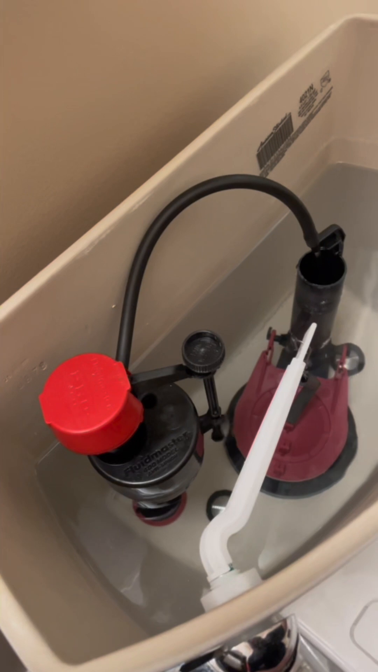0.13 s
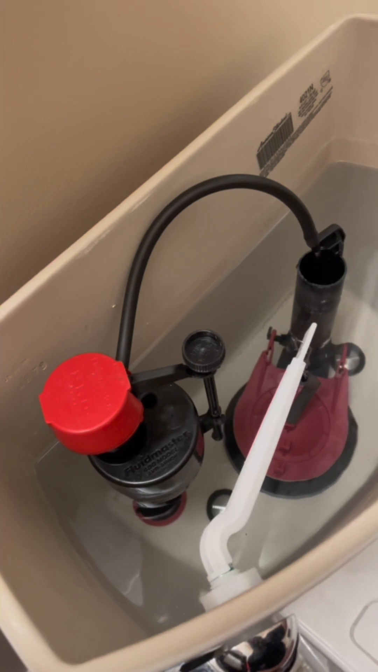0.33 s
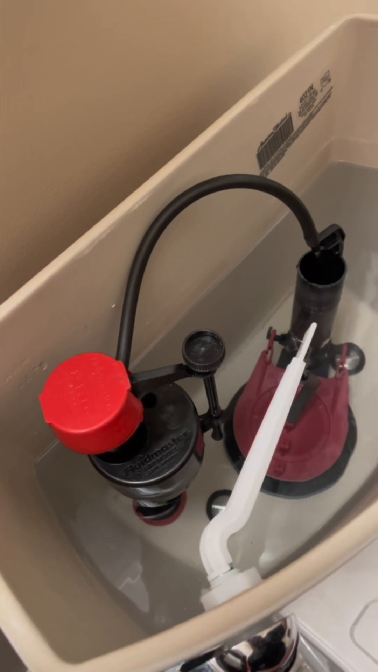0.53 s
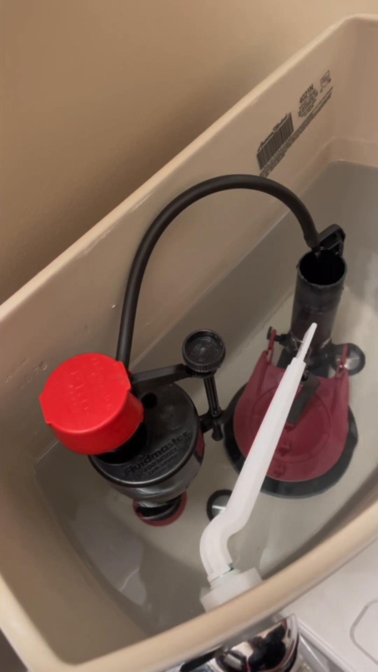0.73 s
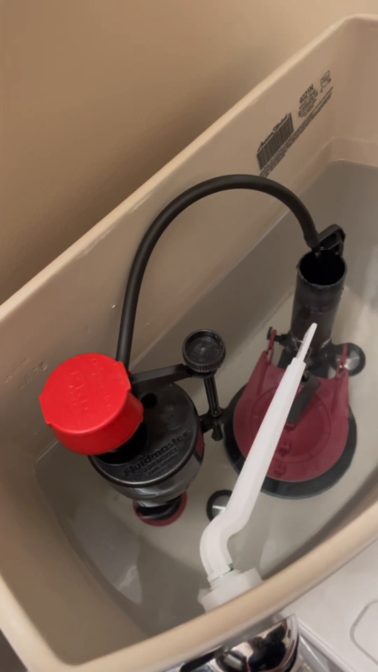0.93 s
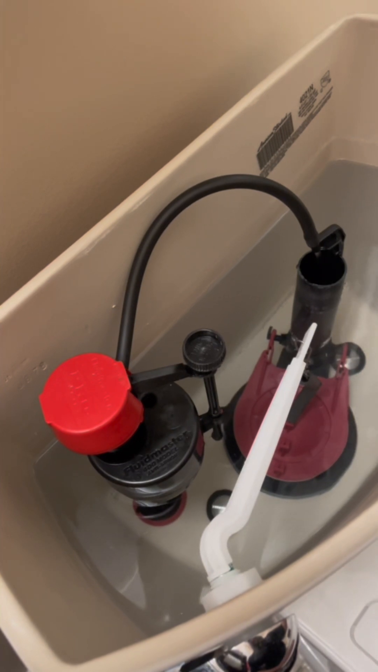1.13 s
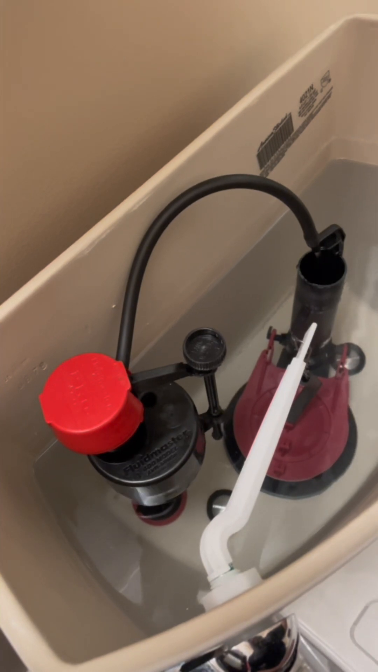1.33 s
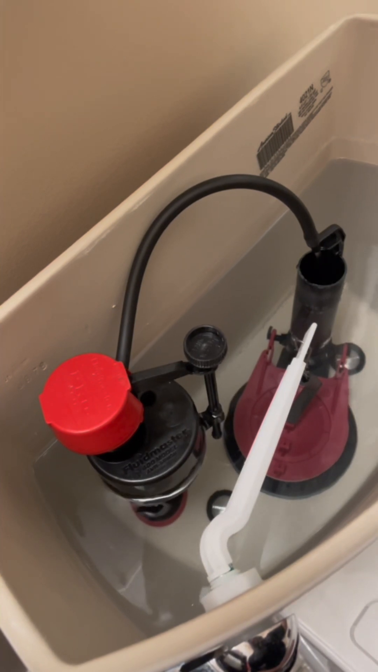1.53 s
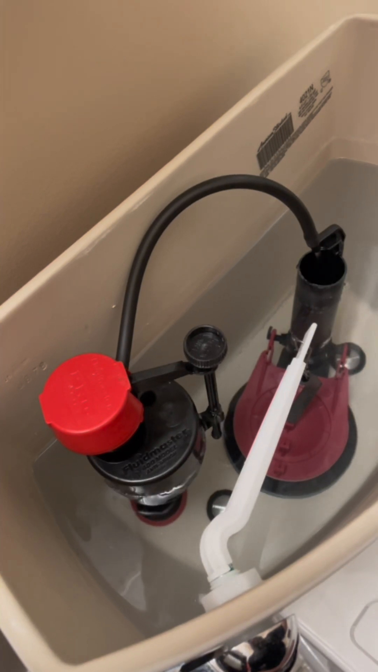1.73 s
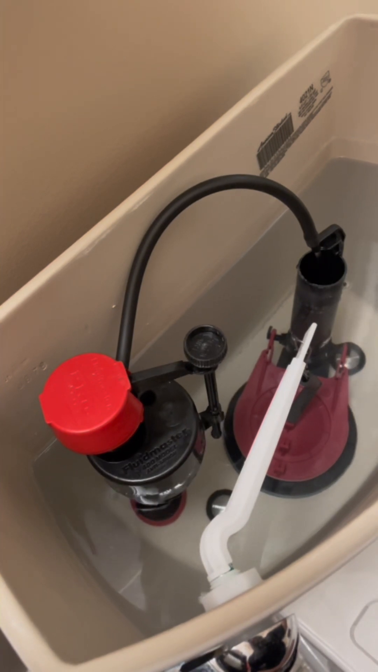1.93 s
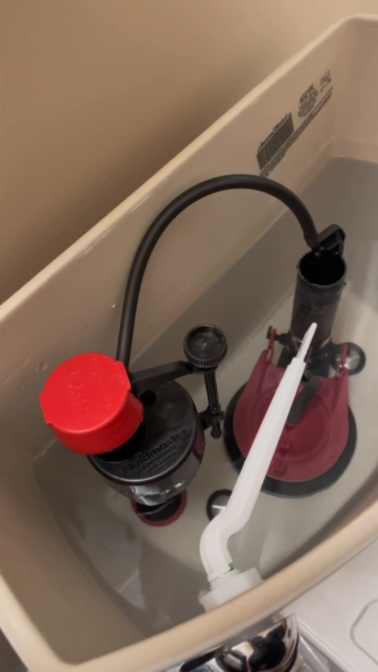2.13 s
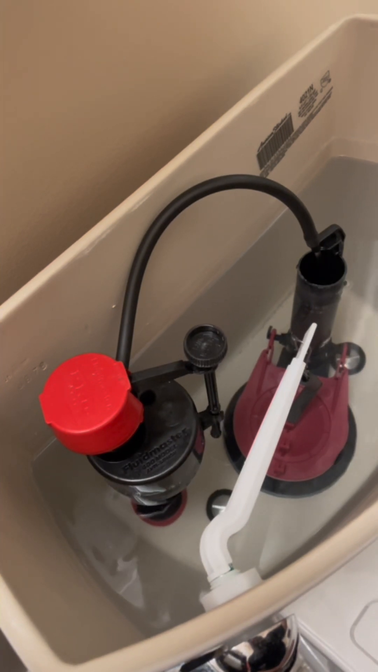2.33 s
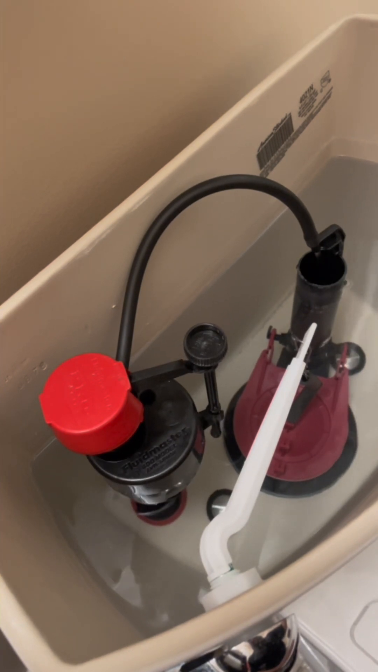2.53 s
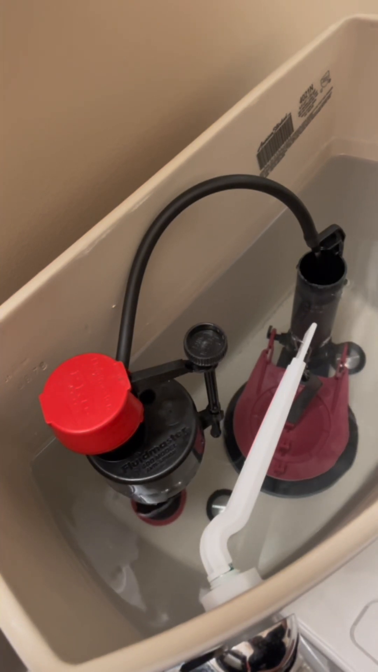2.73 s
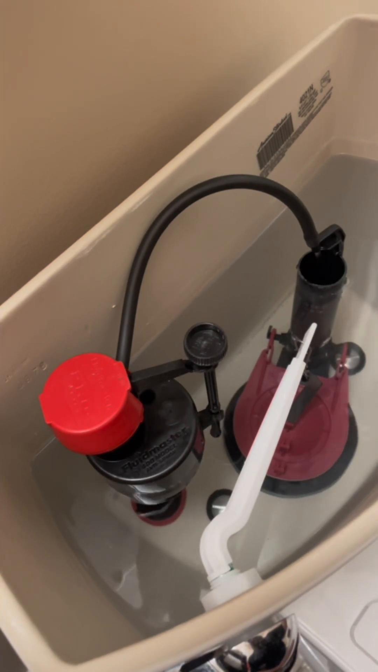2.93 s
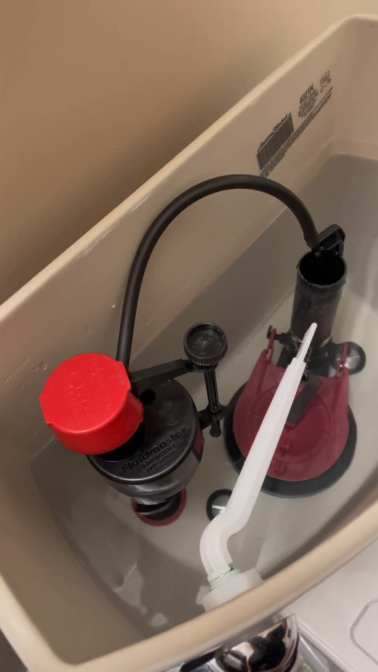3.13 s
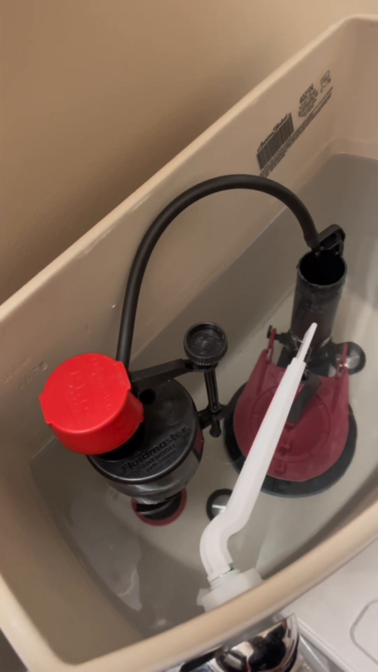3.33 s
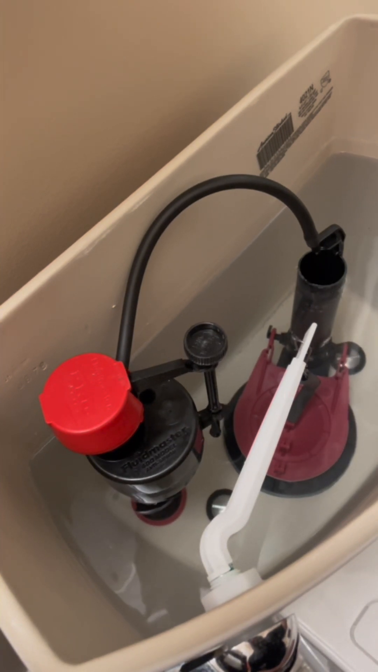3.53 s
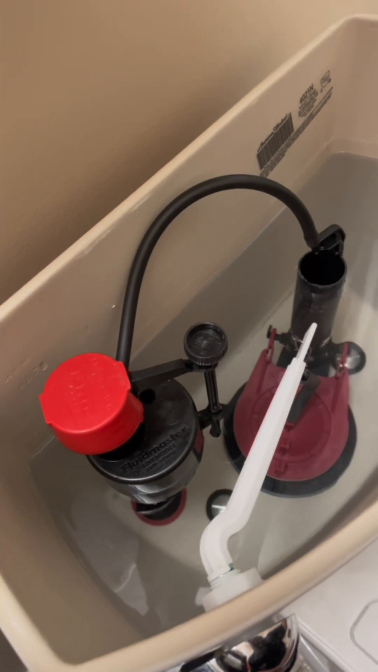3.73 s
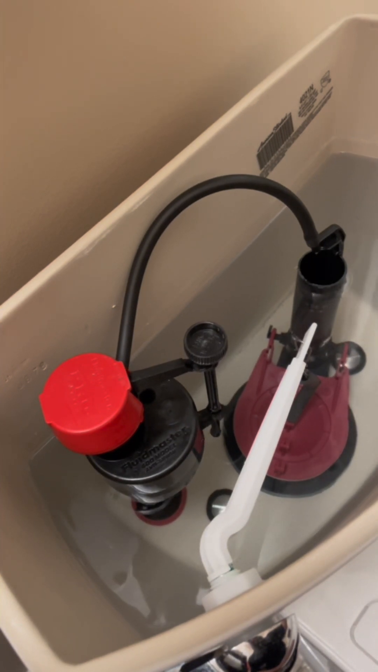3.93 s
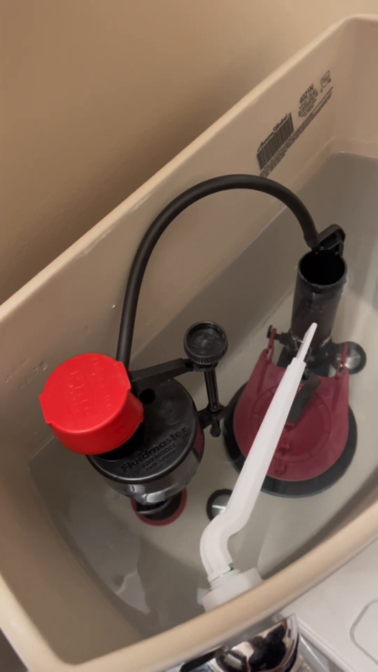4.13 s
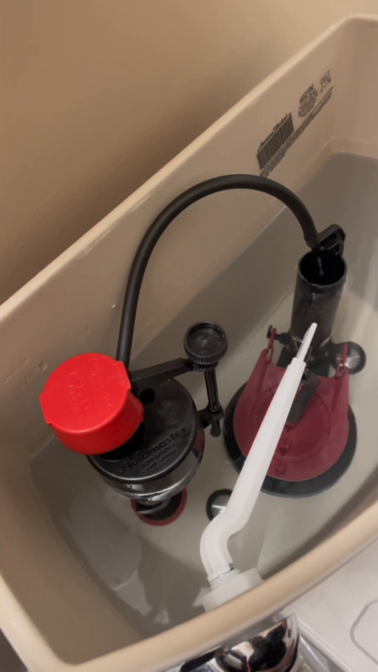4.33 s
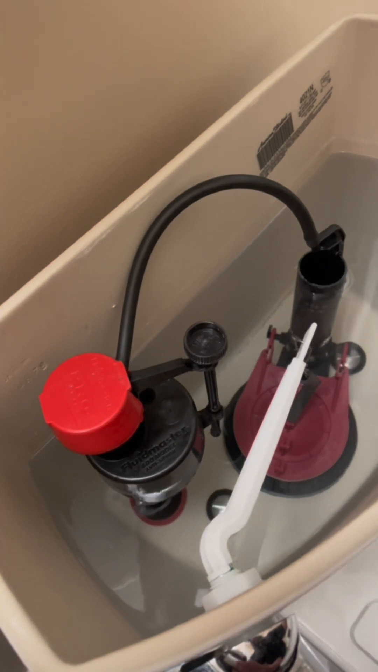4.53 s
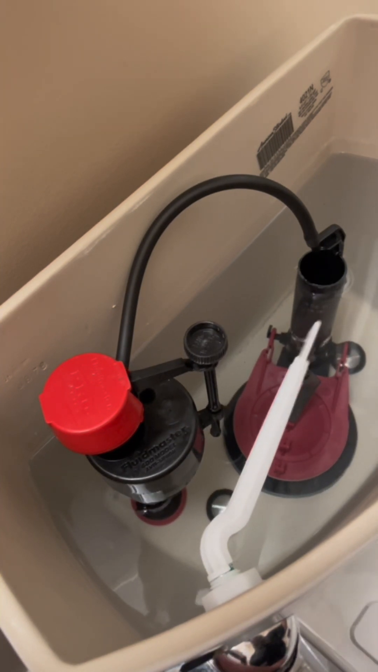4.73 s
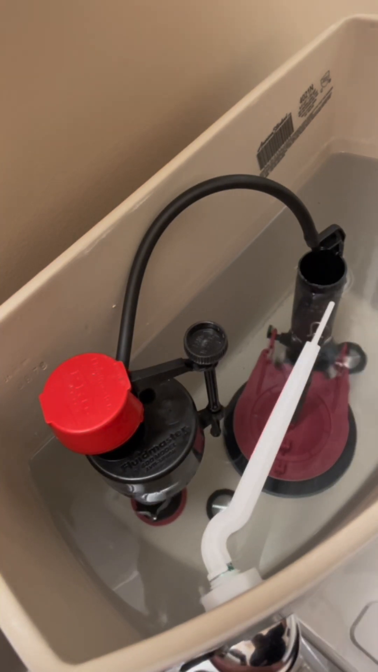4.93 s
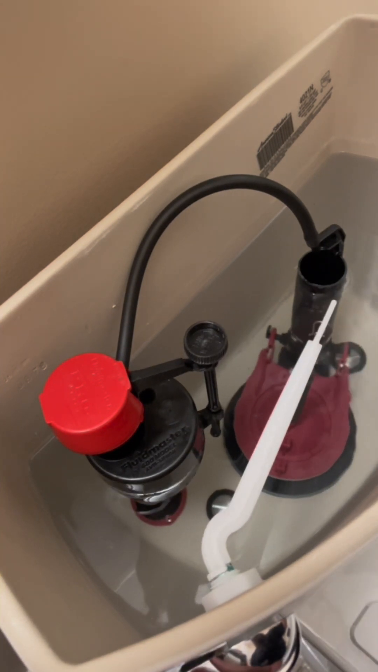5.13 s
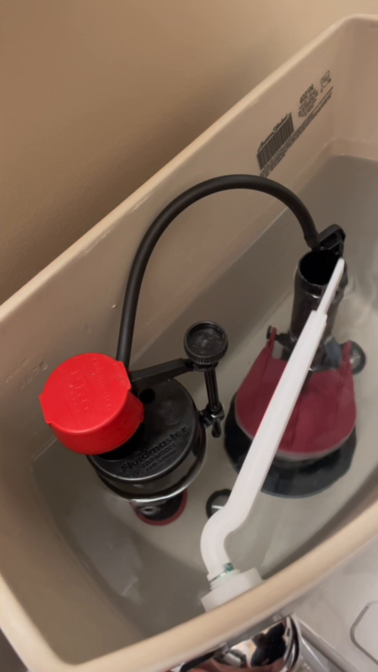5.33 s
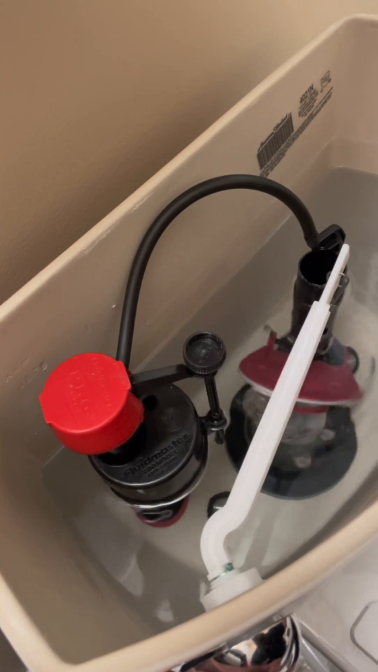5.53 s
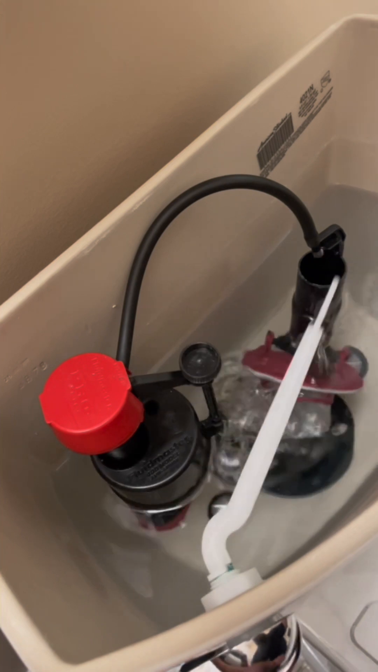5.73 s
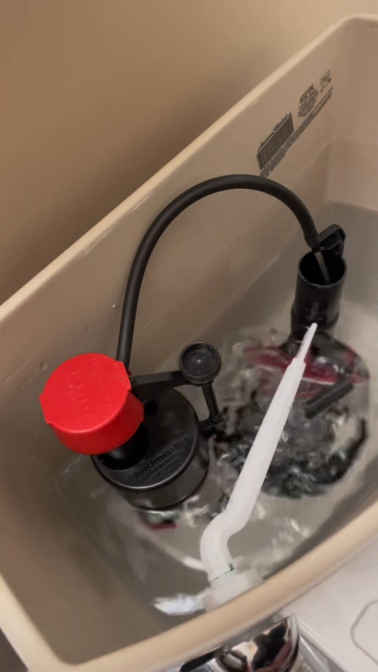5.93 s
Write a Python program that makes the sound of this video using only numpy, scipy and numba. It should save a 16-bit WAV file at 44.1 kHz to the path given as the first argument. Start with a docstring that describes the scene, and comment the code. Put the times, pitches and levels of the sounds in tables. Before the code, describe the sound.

Close over an open toilet tank: steady ringing water hiss stops, two sharp clacks, a quiet pause, then a slurp and bubbling flush.

```python
"""A fill jet hisses and rings in the overflow tube first, over a fan rumbling in the bathroom; a phone is held
just above the open toilet tank. The valve shuts with a ping, plastic clacks and the lever lifts the seal; air
slurps through the gap, then water gulps and rushes out with bursts of spray. Water, air and fan are shaped
noise, clacks and bursts are noise through resonances, bubbles are decaying sines; the picture is stereo."""
import sys
import numpy as np
from scipy import signal
from scipy.fft import rfft, irfft, next_fast_len
from scipy.io import wavfile
from scipy.ndimage import uniform_filter1d
from numba import njit

SR = 44100
rng = np.random.default_rng(int(sys.argv[2]) if len(sys.argv) > 2 else 0)


def master_out(mix):
    """Clip the mix to full scale and print it as 16-bit PCM to the path in sys.argv[1]."""
    frames = np.transpose(np.atleast_2d(mix))
    ceiling = np.clip(frames, -1, 1)
    pcm = np.round(ceiling * 32767).astype(np.int16)
    wavfile.write(sys.argv[1], SR, pcm)


N = 268348
T = np.arange(N) / SR
SIZE = next_fast_len(N + SR // 2)  # transform length, padded against wrap-around
HZ = np.maximum(np.arange(SIZE // 2 + 1) * SR / SIZE, 1)
SLURP_S, BABBLE_FROM_S = 5.245, 5.4  # air breaks past the seal; the outlet starts to babble


def amp(db):
    """Gain of a level in dB."""
    return 10 ** (np.asarray(db) / 20)


def unit(x):
    """Scale to rms 1."""
    return x / np.sqrt(np.mean(x ** 2))


def ramp(from_s, takes_s):
    """Rises in a straight line from 0 to 1."""
    return np.clip((T - from_s) / takes_s, 0, 1)


def gains(table, column, edge_s=0.037):
    """A dB column as gain over time, fading to silence just outside its table."""
    s = np.array(table)[:, 0]
    inside = np.clip(np.minimum(T - s[0], s[-1] - T) / edge_s + 1, 0, 1)
    return amp(np.interp(T, s, np.array(table)[:, column])) * inside


def on_hz(table, column=1):
    """A dB column as gain over frequency, silent outside its table."""
    rows = np.array(table)
    return amp(np.interp(np.log(HZ), np.log(rows[:, 0]), rows[:, column], -200, -200))


def resonances(table):
    """Gain over frequency of (Hz, width, dB) peaks, their powers summed."""
    return np.sqrt(sum(amp(2 * db) / (1 + (2 * (HZ - hz) / width) ** 2) for hz, width, db in table))


def walk(rate):
    """Random levels held 1 / rate s and slewed twice."""
    k = int(SR / rate)
    steps = np.repeat(rng.standard_normal(N // k + 1), k)
    return uniform_filter1d(uniform_filter1d(steps, k), k)[:N]


def noise(gain, flicker_db, rate, count=6, grain_db=0.):
    """Two unrelated noises of one colour, cut in bands that flicker alone; grains make it spitty."""
    grain = uniform_filter1d(rng.standard_normal(N), size=40) * np.sqrt(40)
    white = rng.standard_normal((2, N)) * amp(grain_db * grain)
    spectrum = rfft(white, SIZE) * gain
    live = np.log(HZ[gain > gain.max() / 1000])
    place = np.clip((np.log(HZ) - live[0]) / (live[-1] - live[0]), 0, 1) * (count - 1)
    bands = (irfft(spectrum * np.clip(1 - abs(place - k), 0, 1), SIZE)[:, :N] for k in range(count))
    return unit(sum(band * amp(flicker_db * walk(rate)) for band in bands))


@njit
def sweep(x, hz, width):
    """State-variable band-pass whose centre moves."""
    y, b, l = np.empty(len(x)), 0., 0.
    for i in range(len(x)):
        g, k = np.tan(np.pi * hz[i] / SR), width / hz[i]
        v = (b + g * (x[i] - l)) / (1 + g * (g + k))
        b, l, y[i] = 2 * v - b, l + 2 * g * v, k * v
    return y


def ring(air, hz, width):
    """Both views through one steep resonance, steady or moving, at rms 1."""
    hz, width = hz * np.ones(N), float(width)
    return unit(np.array([sweep(sweep(x, hz, width), hz, width) for x in air]))


def add(out, s, x):
    """Mix x into out from time s."""
    i = int(s * SR)
    out[i:i + len(x)] += x[:N - i]


def tails(t60, db):
    """Two unrelated noise tails that fade by 60 dB in t60, with energy set in dB."""
    t = T[:SR // 2]
    tail = rng.standard_normal((2, len(t))) * 1000 ** (-t / t60) * (1 - np.exp(-t / 0.0011))
    return amp(db) * tail / np.sqrt(np.sum(tail[0] ** 2))


FAN_DB = -43.5
# Colour of the bathroom fan: (frequency [Hz], relative density [dB per Hz])
FAN_COLOUR = [(15, -63.5), (28, -28), (55, -15.5), (85, -19), (110, -7), (140, -3), (200, -17.5),
              (340, -30), (700, -34), (1300, -39), (3000, -47.5), (5000, -52), (6500, -63), (10000, -83),
              (15800, -76)]


def fan():
    """The bathroom fan is a low, nearly steady noise."""
    return amp(FAN_DB) * noise(on_hz(FAN_COLOUR), flicker_db=0.5, rate=4.5, count=8)


ROOM_T60_S, ROOM_HZ = 0.28, 5000


def room(x, wet_db):
    """Tiled walls give single sounds a dull tail; the second view gets a quick echo off the tank wall."""
    dull = signal.lfilter(*signal.butter(1, ROOM_HZ, fs=SR), tails(ROOM_T60_S, wet_db))
    wall_echo = -np.roll(x, int(.0004 * SR))
    return signal.fftconvolve(x[None], dull, axes=1)[:, :N] + np.array([x, wall_echo])


TANK_T60_S, TANK_DB = 0.11, -7


def tank(water):
    """The hard tank walls comb the splashing water with a short, dense tail."""
    return water + signal.fftconvolve(water, tails(TANK_T60_S, TANK_DB), axes=1)[:, :N]


# Valve seat ping: (frequency [Hz], level [dB], t60 [s])
VALVE_MODES = [(2517, 0, .14), (2655, -4, .08), (2400, -3, .04)]
# Lever body: (frequency [Hz], level [dB])
LEVER_MODES = [(1400, -9), (1930, -11), (2280, -4), (2480, 0), (2670, 0)]
# Slips of the lever in its pivot: (time [s], peak level [dB])
LEVER_SLIPS = [(4.814, -41), (4.886, -40), (5.0105, -34.5), (5.048, -46), (5.2275, -28.5)]
PING_S, PING_DB = 3.7187, -42  # the valve seats
LEVER_T60_S, SCRAPE_S = .05, .004


def ticks():
    """The valve pings as it seats; the lever slips in its pivot, a short scrape through its modes."""
    out, t = np.zeros(N), T[:SR // 5]

    def ringing(hz, db, t60):
        return amp(db) * np.sin(2 * np.pi * hz * t) * 1000 ** (-t / t60)

    ping = sum(ringing(*mode) for mode in VALVE_MODES) * (1 - np.exp(-t * 1000))
    add(out, PING_S, amp(PING_DB) * ping)
    body = sum(ringing(hz, db, LEVER_T60_S) for hz, db in LEVER_MODES)
    chances = rng.standard_normal((len(LEVER_SLIPS), len(t)))
    for (s, db), chance in zip(LEVER_SLIPS, chances):
        scrape = chance * np.exp(-t / SCRAPE_S)
        blow = signal.fftconvolve(body, scrape)[:len(t)]
        add(out, s, amp(db) * blow / abs(blow).max())
    return out


# Plastic clacks, and bursts of spray and splashes during the flush:
# (time [s], peak level [dB], strongest frequency [Hz], t60 of the noise [s])
CLACKS_AND_BURSTS = [(3.828, -16.5, 2480, 0.027), (3.8987, -17.5, 3530, 0.021),
                     (4.071, -52.5, 10500, 0.018), (5.234, -37, 3950, 0.03), (5.606, -28, 5460, 0.042),
                     (5.63, -32, 3000, .04), (5.7345, -10, 3400, 0.018), (5.867, -30, 5470, 0.037)]
# Broad resonances that colour them: (frequency [Hz], width [Hz], level [dB])
BROAD_MODES = [(420, 400, 26), (717, 720, 8.5), (1364, 560, -6), (1800, 250, -3), (2160, 200, -2.5),
               (2440, 360, -6), (3190, 1200, -2.5), (4080, 490, -9.5), (4800, 510, -11), (5670, 1200, -8),
               (7400, 1900, -33), (10160, 1800, -29)]
STRONG_DB, STRONG_ROLL_DB = -18, 5  # events this strong ring all modes (roll-off in dB per squared octave)
ROLL_PER_DB = 4.5  # weaker ones ring a narrower band


def clacks_and_bursts():
    """Each clack, burst or splash is a short fading noise through the same set of broad resonances."""
    out, t = np.zeros(N), T[:SR // 8]
    chances = rng.standard_normal((len(CLACKS_AND_BURSTS), len(t)))
    for (s, db, best_hz, t60), chance in zip(CLACKS_AND_BURSTS, chances):
        roll_db = STRONG_ROLL_DB + ROLL_PER_DB * max(STRONG_DB - db, 0)
        fading, event = chance * 1000 ** (-t / t60), 0
        for hz, width, mode_db in BROAD_MODES:
            section = np.concatenate(signal.iirpeak(hz, hz / width / 2.08, SR))
            gain = amp(mode_db - roll_db * np.log2(hz / best_hz) ** 2) / np.sqrt(width)
            event = event + gain * signal.sosfilt([section, section], fading)
        add(out, s, amp(db) * event / abs(event).max())
    return out


# Strength of the fill jet: (time [s], level [dB])
JET_LEVEL = [(0, -40), (.3, -41), (2.8, -41), (3.2, -39.5), (3.42, -42), (3.565, -50), (3.59, -46.5),
             (3.62, -63), (3.64, -56), (3.67, -64.5), (3.78, -66)]
# Colour of its spray: (frequency [Hz], relative density [dB per Hz])
SPRAY_COLOUR = [(800, -7), (1300, -2.5), (2300, -5), (3600, -17), (5000, -6.5), (6500, -12.5),
                (8000, -27.5), (10500, -19.5), (13000, -37.5), (15800, -12)]
# Colour of its splash at the bottom: (frequency [Hz], relative density [dB per Hz])
SPLASH_COLOUR = [(150, -18), (220, 2), (290, -4), (355, -1.5), (500, -11.5), (620, -3), (770, -4),
                 (950, -23), (1200, -54)]
PINCH_FROM_S, PINCH_S = 2.94, 0.44  # the closing valve narrows the jet
SPRAY_DB, SPRAY_PINCHED_DB = -12, -6.5  # relative to the jet, valve open and pinched
SPLASH_DB, SPLASH_PINCHED_DB, DRIP_DB = -12.5, -22, -62  # relative to the jet; the dribble that is left
PINCHED_HZ, PINCHED_WIDTH_HZ, PINCHED_DB = 5240, 1300, -15  # thin hiss, relative to the jet
# the nearly full tube rings broader, relative to the jet
WIDE_HZ, WIDE_WIDTH_HZ, WIDE_DB, WIDE_FROM_S = 2100, 450, -11, 2.5


def fill():
    """The jet sprays and splashes at the bottom; pinched, it hisses thinner and splashes less."""
    jet, pinch = gains(JET_LEVEL, 1), ramp(PINCH_FROM_S, PINCH_S)
    spray_gain = jet * amp(SPRAY_DB + pinch * (SPRAY_PINCHED_DB - SPRAY_DB))
    spray = spray_gain * noise(on_hz(SPRAY_COLOUR), flicker_db=3.0, rate=22.0, grain_db=4.0, count=10)
    thin_gain = jet * pinch * amp(PINCHED_DB + 2.7 * walk(25.04))
    thin = thin_gain * ring(rng.standard_normal((2, N)), PINCHED_HZ, PINCHED_WIDTH_HZ)
    wide_gain = jet * ramp(WIDE_FROM_S, 0.28) * amp(WIDE_DB + 2.2 * walk(30.14))
    wide = wide_gain * ring(rng.standard_normal((2, N)), WIDE_HZ, WIDE_WIDTH_HZ)
    dribble_gain = amp(DRIP_DB) * (1 - ramp(JET_LEVEL[-1][0], 0.41))
    splash_gain = jet * amp(SPLASH_DB + pinch * (SPLASH_PINCHED_DB - SPLASH_DB)) + dribble_gain
    splash = splash_gain * noise(on_hz(SPLASH_COLOUR), flicker_db=2.5, rate=20, count=4)
    return spray + thin + wide + splash


# Resonances of the overflow tube: (frequency [Hz], width [Hz], level [dB])
TUBE_MODES = [(1028, 17, -10), (1302, 29.6, -6.5), (1735, 74, 2), (2151, 74, -0.5), (2296, 43, -7),
              (2530, 126, -15), (2680, 58, -11.5), (3050, 130, -17.5), (3985, 160, -18.5), (4690, 115, -21)]
TUBE_WAVER, TUBE_FLICKER_DB = .009, 1.7  # drift as the jet wets the tube (share of pitch); level flicker
TUBE_FALLS_S, TUBE_FALL_TAKES_S = 3.52, 0.16  # the dying jet no longer blows the tube


def tube():
    """The jet blows the overflow tube; each resonance wavers in pitch and level alone."""
    air, rings = rng.standard_normal((2, N)), 0
    for k, (hz, width, db) in enumerate(TUBE_MODES):
        pitch = hz * (1 + TUBE_WAVER * walk(5.98))
        shifted = np.roll(air, 9001 * k, axis=1)  # keeps the resonances unrelated
        tone = np.array([sweep(x, pitch, float(width)) for x in shifted])
        rings = rings + amp(db + TUBE_FLICKER_DB * walk(22.02)) * tone
    return gains(JET_LEVEL, 1) * (1 - ramp(TUBE_FALLS_S, TUBE_FALL_TAKES_S)) * unit(rings)


# Air column under the seal: (frequency [Hz], width [Hz], level [dB])
GAP_MODES = [(467, 53, -35), (692, 50, -36.5), (1233, 135, -35), (1566, 160, -34.5), (2207, 160, -33.5),
             (2540, 250, -35), (3840, 280, -44.5), (5510, 400, -51.5)]
SLURP_ATTACK_S, SLURP_HOLD_S, SLURP_FADE_DB_PER_S, SLURP_ENDS_S = 0.016, 0.11, 160, 5.55
LIFT_S, LIFT_TAKES_S, LIFT_LENGTH = 5.37, 0.052, 1.045  # seal comes free; final column length over first
DROWNED_HZ = 1000  # resonances below this drown as the seal comes free
SLURP_LATE_S_PER_KHZ, FADE_HALVES_HZ = 0.012, 2500  # higher resonances speak later and last longer


def slurp():
    """Air torn through the gap rings a column that lengthens as the seal lifts; each resonance sputters alone."""
    length = 1 + (LIFT_LENGTH - 1) * ramp(LIFT_S, LIFT_TAKES_S)
    air, out = rng.standard_normal((2, N)), 0
    fade_db = SLURP_FADE_DB_PER_S * np.maximum(T - SLURP_S - SLURP_ATTACK_S - SLURP_HOLD_S, 0)
    for hz, width, db in GAP_MODES:
        speaks = ramp(SLURP_S + SLURP_LATE_S_PER_KHZ * hz / 1000, SLURP_ATTACK_S)
        drowned = (hz < DROWNED_HZ) * ramp(LIFT_S, 0.018)
        level_db = db + 4.2 * walk(110) - fade_db / (1 + (hz / FADE_HALVES_HZ) ** 2)
        out = out + speaks * (1 - drowned) * amp(level_db) * ring(air, hz / length, width)
    return out * (1 - ramp(SLURP_ENDS_S, 0.027))


# Single bubbles and gulps of air: (time [s], level near the peak [dB], starting pitch [Hz])
AIR_POCKETS = [(.0513, -31.5, 2290), (1.08, -40, 2680), (1.197, -38.5, 2500), (1.458, -37.5, 2450),
               (1.601, -38, 1490), (2.655, -36, 2385), (5.24, -35, 2620), (5.26, -33, 1230),
               (5.379, -26, 1606), (5.379, -24, 2220), (5.419, -29, 1595), (5.402, -22, 652),
               (5.424, -18.5, 494), (5.493, -20, 338), (5.508, -19, 364), (5.518, -11.5, 377),
               (5.533, -24, 373), (5.5705, -25, 1535), (5.578, -23, 720), (5.588, -30, 1090),
               (5.604, -25, 715), (5.664, -26, 760), (5.627, -28, 1720), (5.649, -19, 345),
               (5.679, -19, 384), (5.75, -17, 395), (5.802, -26, 2286), (5.8062, -24, 1464),
               (5.816, -11.5, 552), (5.8755, -22.5, 1083), (5.897, -15, 432), (5.919, -19.5, 610),
               (5.9186, -24.5, 1046), (5.938, -29, 2250), (5.944, -20, 722), (5.9488, -25.5, 1094),
               (5.9506, -25, 2330), (5.972, -31, 2555), (6.002, -33, 2700), (6.044, -13.5, 270),
               (6.056, -35, 2330), (6.064, -18.5, 357)]
GULP_T60_S, T60_S_PER_KHZ2 = 0.043, 0.0075  # small bubbles ring longer
RISE_OCTAVES_PER_S, STEADY_HZ = 1.5, 1100  # large pockets rise; well above this pitch they hold still


def bubbles():
    """A pocket of air swells, rings unevenly and rises in pitch as it nears the surface."""
    out, t = np.zeros(N), T[:SR // 4]
    chances = rng.standard_normal((len(AIR_POCKETS), len(t)))
    for (s, db, hz), chance in zip(AIR_POCKETS, chances):
        t60 = GULP_T60_S + T60_S_PER_KHZ2 * (hz / 1000) ** 2
        rise = RISE_OCTAVES_PER_S * np.exp(-(hz / STEADY_HZ) ** 2)
        swell = (1 - np.exp(-t * np.sqrt(hz) / 0.052)) ** 2  # large pockets take longer
        wobble = unit(uniform_filter1d(uniform_filter1d(chance, size=200), size=200))
        shape, uneven_db = swell * 1000 ** (-t / t60), 1.5 * wobble[::-1]
        pitch = hz * 2 ** (rise * t) + 14 * wobble
        tone = np.sin(2 * np.pi * np.cumsum(pitch) / SR)
        add(out, s, amp(db + uneven_db) * shape / shape.max() * tone)
    return out


def babble(start_s, end_s, low_hz, octaves, cycles, glide, count):
    """Small bubbles at random moments, each a short rising chirp."""
    out, t = np.zeros(N), T[:SR // 12]
    for when, pitch, size in rng.random((count, 3)):
        hz = low_hz * 2 ** (octaves * pitch)
        shape = np.exp(-t * hz / cycles) * (1 - np.exp(-t * hz / 2))
        tone = np.sin(2 * np.pi * hz * t * (1 + glide * t)) * shape
        add(out, start_s + when * (end_s - start_s), tone * (1 - size) ** -.3)  # a few are much louder
    return out


# Water through the lifting seal: (time [s], level [dB])
RUSH_LEVEL = [(4.72, -77), (4.8, -58.5), (4.9, -52), (5.2, -51), (5.29, -40.5), (5.42, -37), (5.54, -38),
              (5.575, -48), (5.62, -34), (5.7, -43), (5.79, -37.5), (5.82, -37), (5.9, -37), (5.97, -32.5),
              (6.03, -36.5), (6.085, -30)]


def froth():
    """Flecks in the overflow tube while it fills; crowds of bubbles and spatter once the tank drains."""
    end_s, jet_end_s = N / SR, JET_LEVEL[-1][0]
    flecks = babble(0, jet_end_s, low_hz=1600, octaves=.75, cycles=30, glide=.8, count=70)
    crowd = babble(BABBLE_FROM_S, end_s, low_hz=381.5, octaves=2.8, cycles=6.0, glide=3.84, count=200)
    gliding = amp(-3) * babble(SLURP_S, end_s, low_hz=700, octaves=1.9, cycles=12, glide=1.5, count=200)
    spatter = amp(-8) * babble(SLURP_S, end_s, low_hz=3000, octaves=1.1, cycles=12, glide=6, count=220)
    return amp(-5) * gains(JET_LEVEL, 1) * flecks + gains(RUSH_LEVEL, 1) * (crowd + gliding + spatter)


# Colour of the rushing water: (frequency [Hz], relative density [dB per Hz])
WATER_COLOUR = [(400, -4), (700, -2), (950, -11), (1700, -6), (2000, -8.5), (2600, -5), (3100, -13.5),
                (4000, -13.5), (4750, -22), (5400, -12.5), (6300, -18), (8000, -18.5), (10500, -18.5),
                (13000, -24), (15800, -15)]
# Gurgle of the outlet: (time [s], level [dB], cavity frequency [Hz])
OUTLET_GURGLE = [(5.24, -49.5, 473), (5.37, -52, 640), (5.41, -45, 564), (5.46, -33.5, 415),
                 (5.52, -23.5, 390), (5.62, -30, 304), (5.77, -31, 378), (5.92, -30, 342),
                 (5.98, -40.5, 300), (6.085, -24, 313)]
# Resonances of the drain pipe: (frequency [Hz], width [Hz], level before squaring [dB])
DRAIN_MODES = [(103, 35, 3.5), (138, 39, -2), (231, 90, 0)]
FULL_DB = -35  # stronger flow is brighter: spray and mist at this level, and their dB per dB of flow
FLUSH_SPRAY_DB, SPRAY_SLOPE, MIST_DB, MIST_SLOPE = -44.5, 1.08, -54, 1.4
RUMBLE_S, RUMBLE_DB, RUMBLE_RISE_DB_PER_S = 5.47, -33.5, 77  # the drain pipe is full from this time
THROAT_HZ, THROAT_WIDTH_HZ, THROAT_DB = 730, 60, -5  # mouth of the outlet, relative to the rush


def flush():
    """Rush, spray and mist through the seal, the churning cavity of the outlet and the drain rumble."""
    low, high = 1 / np.sqrt(1 + (HZ / 3000) ** 8), 1 / np.sqrt(1 + (7000 / HZ) ** 8)
    colour, flow = on_hz(WATER_COLOUR), gains(RUSH_LEVEL, 1)
    fullness = flow / amp(FULL_DB)
    spray_gain = amp(FLUSH_SPRAY_DB) * fullness ** SPRAY_SLOPE
    mist_gain = amp(MIST_DB) * fullness ** MIST_SLOPE
    rush = flow * noise(colour * low, flicker_db=5.5, rate=30, count=10)
    spray = spray_gain * noise(colour * (1 - low) * (1 - high), flicker_db=3, rate=45, grain_db=2.5)
    mist = mist_gain * noise(colour * high, flicker_db=3, rate=45, count=4, grain_db=2.5)
    cavity_hz = np.interp(T, *np.array(OUTLET_GURGLE)[:, [0, 2]].T)
    cavity = ring(rng.standard_normal((2, N)), cavity_hz, 250)
    churn = gains(OUTLET_GURGLE, 1) * amp(3.5 * walk(40)) * cavity
    rumble_gain = amp(RUMBLE_DB - RUMBLE_RISE_DB_PER_S * np.maximum(RUMBLE_S - T, 0))
    rumble = rumble_gain * noise(resonances(DRAIN_MODES) ** 2, flicker_db=-0.5, rate=16, count=2)
    throat_gain = flow * ramp(BABBLE_FROM_S, 0.044) * amp(THROAT_DB + 7.2 * walk(25))
    throat_hz = THROAT_HZ * (1 + 0.043 * walk(12))
    throat = throat_gain * ring(rng.standard_normal((2, N)), throat_hz, THROAT_WIDTH_HZ)
    return rush + spray + mist + churn + rumble + throat


# Tone balance of the stereo picture: (frequency [Hz], level of sum [dB], level of difference [dB])
STEREO_BALANCE = [(60.5, 4, -56), (155, -1.5, -27.5), (349, 3, -6), (670, 0, -7), (1265, -2.5, -10),
                  (1865, -2.5, -27.5), (2640, -1.5, -7.5), (2810, -4, -4), (3075, 0, -5), (4540, 2.5, -1),
                  (5870, 2, -9.5), (6390, 2, 4), (7240, -25, 12), (8270, -27.5, 6), (8980, 5.5, 16),
                  (10400, 10.5, -31), (12850, 10, 6), (13300, -25.5, 13), (15000, -36.5, 9),
                  (15000, -3.5, -12)]


def stereo(field):
    """The first view sounds alike in both channels, the second with opposite sign."""
    table = [(1, 0.0035, -29)] + STEREO_BALANCE + [(SR / 2, 0, 0)]
    weights = np.array([on_hz(table, column=k) for k in (1, 2)])
    shared, apart = irfft(rfft(field, SIZE) * weights, SIZE)[:, :N]
    return np.array([shared + apart, shared - apart])


ROOM_DB, BUBBLE_ROOM_DB = -8, -13  # room tail; bubbles and ticks are close and shut in by the tank


def scene():
    """Fan, tank water, air, clacks and bursts add up in two views, which become the stereo picture."""
    water = tank(fill() + flush())
    short_events = room(clacks_and_bursts(), ROOM_DB)
    close = room(ticks() + bubbles() + froth(), BUBBLE_ROOM_DB)
    return stereo(fan() + short_events + close + tube() + slurp() + water)


TOP_HZ = 15700


def record(dry):
    """The phone cuts the top with a steep low-pass."""
    return signal.sosfilt(signal.ellip(10, .2, 80, TOP_HZ, fs=SR, output="sos"), dry)


dry = scene()
out = record(dry)
master_out(out)
```